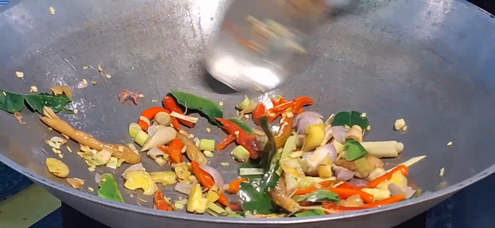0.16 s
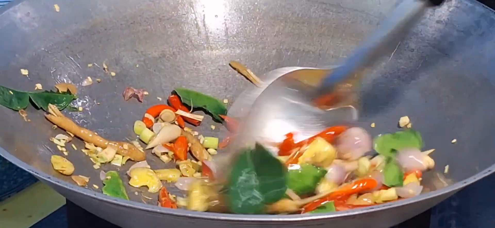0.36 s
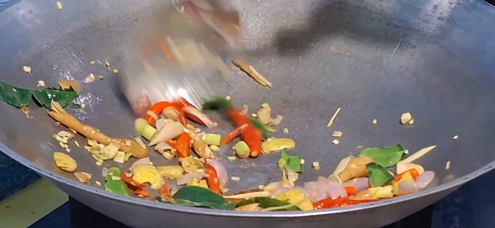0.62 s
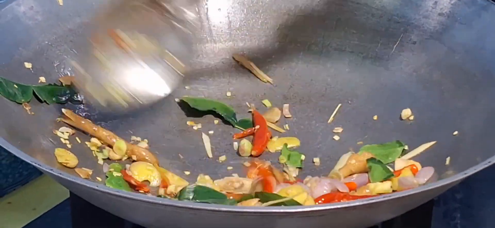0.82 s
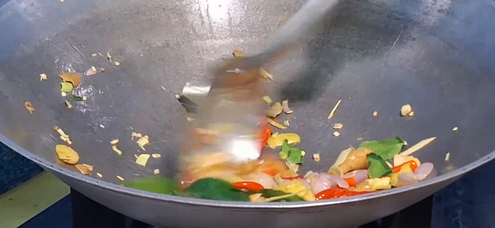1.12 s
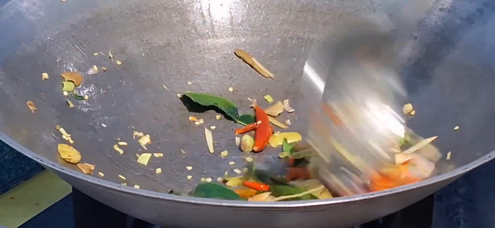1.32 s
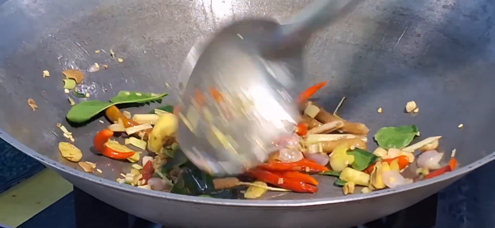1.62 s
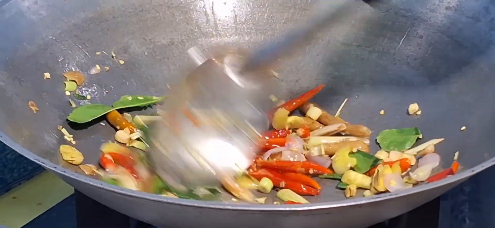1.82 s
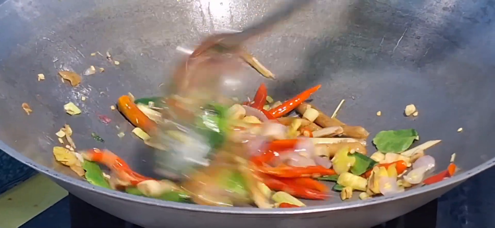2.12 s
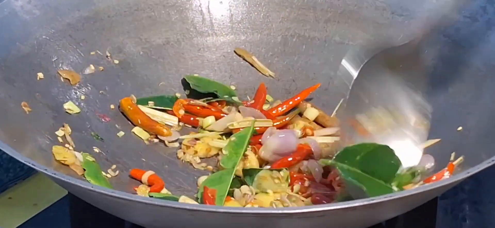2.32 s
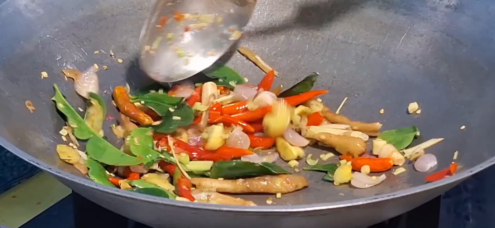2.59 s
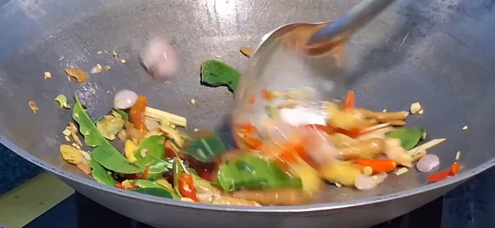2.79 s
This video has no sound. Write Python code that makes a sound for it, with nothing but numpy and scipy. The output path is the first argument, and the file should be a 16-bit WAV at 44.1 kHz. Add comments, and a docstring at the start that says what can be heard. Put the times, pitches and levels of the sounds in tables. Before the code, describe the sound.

A metal spatula clanks and scrapes in a wide wok, close in stereo in a small kitchen. Soft sizzle, low burner rumble and faint hum run throughout. A light food pat at 0.1 s precedes ringing knocks at 0.24, 0.64, 1.0, 1.4, 1.8, 2.4 and 2.7 s. Short raspy slides follow most, longest around 1.0-1.2; faint pats fall near 0.9, 1.6 and 2.1; sizzle swells around 1.5.

```python
"""A soft sizzle over a low hum and a burner's rumble; a small pat of food, then the first knock of steel on steel.
A spatula tosses chillies, herbs and shallots in a wide wok, close by in a small kitchen. Seven knocks excite
decaying modes of wok, blade and stove; slides of the blade are random slips filtered into rasp and ringing.
Pats are bursts of clicks, the sizzle is sputtering noise with pops, and the burner is low noise and two sines."""
import sys
import numpy as np
from scipy import signal
from scipy.fft import irfft
from scipy.io import wavfile
from scipy.ndimage import uniform_filter1d, map_coordinates

SR = 44100
rng = np.random.default_rng(int(sys.argv[2]) if len(sys.argv) > 2 else 0)


def int16_out(signal):
    """Quantize to a 16-bit WAV file."""
    q = np.round(np.clip(np.atleast_2d(signal).T, -1, 1) * 32767)
    wavfile.write(sys.argv[1], SR, q.astype(np.int16))


N = 130095  # samples in the scene

# blade meets pan: (time [s], favoured wok pitch [Hz], favoured blade pitch [Hz], added crack [dB],
# stove thump [dB], wok modes [dB], blade modes [dB], then the clang's gain at each of TONE_HZ [dB])
KNOCKS = [(0.2383, 970, 4160, 2, -34.5, -34, -23, -24.5, -21, -19.5, -11.5),
          (.6414, 950, 4570, 1.5, -39.5, -36, -31, -27.5, -29.5, -18, -14),
          (1.004, 704, 1950, -2, -48, -34.5, -24.5, -59, -27, -30, -18),
          (1.425, 474, 4080, -6.5, -40.5, -29, -39, -21, -29, -19.5, -17.5),
          (1.7808, 670, 4680, 5.5, -41.5, -30, -19.5, -24, -23, -18, -15),
          (2.4005, 489, 6800, 5.5, -34, -26.5, -34, -13.5, -17.5, -15.5, -12.5),
          (2.7084, 900, 3600, -1, -36.5, -36, -27.5, -24, -22, -20, -18)]
# corners of the tone curve given to each knock and slide: (frequency [Hz])
TONE_HZ = [450, 1600, 4200, 9000]
# blade slides on: (start [s], time to hardest push [s], length [s], pitch factor [ratio], ring of the pan [dB],
# then gain at each of TONE_HZ [dB])
SCRAPES = [(.243, 0.0093, 0.09, 0.9, -13, -25.5, -28, -22.5, -20),
           (.645, 0.026, 0.038, 0.98, -12, -29, -28.5, -18, -19),
           (.684, .028, 0.1, .98, -22, -28.5, -31, -27, -26),
           (.742, 0.014, 0.047, .94, -6, -35.5, -21.5, -29.5, -30),
           (1.006, 0.015, 0.062, 0.96, -6, -32, -19.5, -26, -26),
           (1.05, 0.041, 0.15, .97, -11, -22.5, -32, -22, -18.5),
           (1.14, 0.039, 0.087, 0.87, -20, -24, -39, -35.5, -36),
           (1.785, 0.017, 0.057, 0.98, -12, -18.5, -38, -21, -20.5),
           (2.715, 0.019, .12, 0.94, -16, -29, -30.5, -28.5, -26),
           (2.775, 0.023, .035, .94, -13, -43, -28.5, -35, -42)]
# food lands on the pan: (time [s], level [dB])
PATS = [(.104, -36), (0.915, -35), (1.567, -36.5), (2.113, -37.5)]
# pitches of the wok's modes: (frequency [Hz])
WOK_HZ = [322, 382, 421, 468, 535, 590, 666, 698, 777, 845, 885, 1025, 2140]
# ring of the wok at each of WOK_HZ: (relative level [dB], t60 [s])
WOK_RINGS = [(-16.5, 0.91), (-7, 0.57), (-9.5, 0.54), (-10, 0.5), (-8.5, 0.42), (-2, 0.37), (-2, 0.53),
             (-1, 0.38), (-7.5, 0.41), (-4, 0.38), (-5, .34), (0.5, 0.18), (-8, 0.32)]
# rings of the blade: (frequency [Hz], relative level [dB])
BLADE_RINGS = [(3495, -2), (4016, -6), (4190, -4), (4416, -2), (5176, -5), (5340, -4), (6360, -10)]
# rings of the stove under the wok: (frequency [Hz], relative level [dB], t60 [s])
STOVE_RINGS = [(66.9, 2, 0.64), (83.2, -5, 0.89), (132.5, 6, 0.27), (221, 6.5, 0.2), (303.3, 1.5, 0.43)]
# spectrum of the crowd of weaker modes: (frequency [Hz], relative level per Hz [dB])
CLANG_SPECTRUM = [(100, -26), (250, -12), (480, 0.5), (650, 5), (1000, 6), (1270, -3), (1600, 1.5),
                  (2100, 3), (2800, -6), (3600, -0.5), (4400, 0), (5900, -4.5), (7500, -4.5),
                  (11000, -10.5), (16000, -14)]
# decay of that crowd: (frequency [Hz], t60 [s])
CLANG_T60 = [(200, 0.67), (700, 0.31), (3500, .33), (12000, 0.32)]
# spectrum of the rasping slips: (frequency [Hz], relative level per Hz [dB])
RASP_SPECTRUM = [(150, -12), (740, -3), (1270, -20), (1700, -12), (2450, -3), (3400, 0.5), (4300, 4),
                 (6300, -1.5), (16000, -9)]
# resonances of the blade pressed on the pan, before the pitch factor and the sag:
# (frequency [Hz], width [Hz], relative level [dB])
SLIDING_RESONANCES = [(860, 14.4, -11), (1119, 18, -15), (1700, 20, -13), (1913, 47, -17),
                      (2246, 26, -13.5), (2976, 80, -11), (3700, 32, -9), (4294, 200, -3),
                      (5370, 53, -10.5)]
# spectrum of landing food: (frequency [Hz], relative level per Hz [dB])
PAT_SPECTRUM = [(150, -28), (1000, -2), (2400, 10.5), (5000, 9), (15000, -2)]
# sizzle swells when food is turned on to hot metal: (time [s], level [dB])
SIZZLE_LEVEL = [(.14, -32), (.5, -33.5), (.87, -37.5), (1.378, -37.5), (1.548, -32), (2.05, -34.5),
                (2.33, -35), (2.6, -33), (2.95, -34.5)]
# spectrum of the sizzle: (frequency [Hz], relative level per Hz [dB])
SIZZLE_SPECTRUM = [(150, -57), (250, -5.5), (606, -9), (672, -4.5), (786, -8.5), (1300, -11), (1970, -8),
                   (3090, -4), (8030, -1), (15800, -1.5)]
# spectrum of the burner's rumble: (frequency [Hz], relative level per Hz [dB])
RUMBLE_SPECTRUM = [(20, -38), (35, -4.5), (66, 3.5), (82, 4), (105, -4.5), (140, -6), (600, -24),
                   (2000, -56)]
# motor hum: (frequency [Hz], rms level [dB])
HUM = [(48.6, -50.5), (143, -60)]
# stereo width: (frequency [Hz], gain of the side signal [dB])
WIDTH = [(60, -14.5), (130, -9.5), (280, -14), (550, -6.5), (1000, -2), (2000, 0)]
# balance of the microphones: (frequency [Hz], left minus right [dB])
BALANCE = [(60, 3), (140, 0), (4000, 0.5), (12000, -2)]

# knocks
RING_S = 0.6  # length given to each knock and slide
MODE_SCATTER_DB, RING_RISE_S, THUMP_RISE_S = 3.5, 0.0011, 0.0078
BLADE_T60_S = 0.22
MODE_SHARE = 0.11  # share of whole-Hz pitches that belong to the crowd of weaker modes
CRACK_S = 0.009  # fade of the edge's first bite
RIPPLE_DB, RIPPLE_HZ = 3.8, 75  # depth for the clang; spacing of peaks and dips
# each spot that is struck favours the modes near two pitches
SPOT_DB, WOK_SPOT_OCTAVES, BLADE_SPOT_OCTAVES = 5.5, 0.25, 0.12

# scrapes
SLIPS_PER_S, SLIP_SPREAD_DB = 3500, 3
START_FORCE = 0.58  # share of the hardest push
CLUMP_DB, CLUMP_S = 1.5, 0.003  # the edge catches and lets go
RASP_RIPPLE_DB, SLIDING_DB = 6.5, -1
SAG_PER_S = 0.55  # exponential rate at which pitch falls with travel
RUB_HZ, RUB_WIDTH_HZ = 685, 16  # the pan's own resonance

# food, burner and room
PAT_GRAINS_PER_S, PAT_S = 840, 0.026  # click density; fade time constant
POPS_PER_S, POP_SPREAD_DB, POPS_DB = 2000, 3, -6.5  # POPS_DB is relative to the raw hiss
SPUTTER_DB = 1.82  # the hiss comes in short, uneven puffs
RUMBLE_DB = -44
ROOM_T60_S, ROOM_DB = 0.34, -4.5

# microphones
CEILING, EDGE_HZ = 0.95, 15950  # soft limit at full scale 1; band limit


def knocks():
    """Each blow cracks, rings pan and blade with a crowd of weaker modes, and shakes the stove."""
    out = np.zeros((2, N))
    t = np.arange(0, RING_S, 1 / SR)
    hz = np.geomspace(50, 16000, 300)
    for s, wok_hz, blade_hz, crack_db, thump_db, wok_db, blade_db, *tone_db in KNOCKS:
        clang = weaker_modes(t)
        clang = clang * (1 + amp(crack_db) * np.exp(-t / CRACK_S))
        clang = clang * (1 - np.exp(-t / RING_RISE_S))
        clang = colour(clang, list(zip(TONE_HZ, tone_db)))

        wok_modes = [(pitch, *mode) for pitch, mode in zip(WOK_HZ, WOK_RINGS)]
        blade_modes = [(*mode, BLADE_T60_S) for mode in BLADE_RINGS]
        wok = amp(wok_db) * ring(wok_modes, RING_RISE_S)
        blade = amp(blade_db) * ring(blade_modes, RING_RISE_S)

        favour = bump(hz, wok_hz, WOK_SPOT_OCTAVES) + bump(hz, blade_hz, BLADE_SPOT_OCTAVES)
        metal = colour(clang + wok + blade, list(zip(hz, SPOT_DB * favour)))
        thump = amp(thump_db) * ring(STOVE_RINGS, THUMP_RISE_S)
        add(out, s, metal + thump)
    return out


def weaker_modes(t):
    """Many faint modes with random phases, each pitch region decaying at its own speed."""
    is_mode = rng.random(SR // 2 + 1) < MODE_SHARE  # one bin per Hz
    phases = np.exp(2j * np.pi * rng.random((2, len(is_mode))))
    crowd = evened(irfft(is_mode * phases))[:, :len(t)]
    crowd = uneven(colour(crowd, CLANG_SPECTRUM), RIPPLE_DB)
    return die_away(evened(crowd), CLANG_T60)


def ring(modes, rise_s):
    """Decaying modes of varying strength; each reaches one microphone a quarter cycle before the other."""
    t, out = np.arange(0, RING_S, 1 / SR), 0
    for hz, db, t60 in modes:
        size = amp(db + MODE_SCATTER_DB * rng.standard_normal())
        lead = rng.permutation([0, .25])[:, None]  # in cycles, for either microphone
        turns = hz * t + rng.random() + lead
        decay = np.exp(-np.log(1000) * t / t60)
        out = out + size * decay * np.sin(2 * np.pi * turns)
    return out * (1 - np.exp(-t / rise_s))


def scrapes():
    """Tiny slips of the edge rasp, ring the pan, and feed resonances that sag as the blade travels."""
    out = np.zeros((2, N))
    t = np.arange(0, RING_S, 1 / SR)
    for s, push_s, length, pitch, pan_db, *tone_db in SCRAPES:
        force = np.interp(t, [0, push_s, max(length, push_s)], [START_FORCE, 1, 0])
        catch = np.interp(t / CLUMP_S, np.arange(len(t)), rng.standard_normal(len(t)))
        slips = grains(len(t), SLIPS_PER_S, SLIP_SPREAD_DB) * force * amp(CLUMP_DB * catch)

        rasp = evened(sag(uneven(colour(slips, RASP_SPECTRUM), RASP_RIPPLE_DB)))
        sliding = 0
        for hz, width, db in SLIDING_RESONANCES:
            falling_hz = hz * pitch * np.exp(-SAG_PER_S * t)
            sliding = sliding + amp(db) * evened(resonate(slips, falling_hz, width))
        pan = evened(resonate(slips, np.full(len(t), RUB_HZ), RUB_WIDTH_HZ))

        sound = rasp + amp(SLIDING_DB) * sliding + amp(pan_db) * pan
        sound = sound * np.sqrt(np.mean(force ** 2))  # loudness follows the push
        add(out, s, colour(sound, list(zip(TONE_HZ, tone_db))))
    return out


def resonate(x, hz, width):
    """A resonance that follows the curve hz, with its far skirts trimmed."""
    turn = np.exp(2j * np.pi * np.cumsum(hz) / SR)
    x = x / turn  # shifts the resonance down to 0 Hz
    for r in np.exp(-np.pi * width * np.array([1, 8]) / SR):
        x = signal.lfilter([1 - r], [1, -r], x)
    return (turn * x).real


def sag(x):
    """Plays a sound ever slower, so that all its peaks glide down together."""
    at = np.cumsum(np.exp(-SAG_PER_S * np.arange(x.shape[1]) / SR))
    return np.array([map_coordinates(channel, [at], order=5) for channel in x])


def uneven(x, depth_db):
    """Thin steel radiates unevenly: random peaks and dips, new for each point of contact."""
    hz = np.arange(0, SR / 2, RIPPLE_HZ)
    ripple = np.clip(rng.standard_normal(len(hz)), -2, 1.6)
    db = depth_db * ripple * np.minimum(hz / 1500, 1)  # shallower below 1500 Hz
    return colour(x, list(zip(hz, db)))


def pats():
    """Tossed pieces fall back in a short patter of random clicks that fades exponentially."""
    out = np.zeros((2, N))
    t = np.arange(SR // 4) / SR
    for s, db in PATS:
        patter = evened(colour(grains(len(t), PAT_GRAINS_PER_S, POP_SPREAD_DB), PAT_SPECTRUM))
        add(out, s, amp(db) * patter * np.exp(-t / PAT_S))
    return out


def sizzle():
    """Moisture boils off the food: a fine hiss with small pops in it."""
    hiss = rng.standard_normal((2, N))
    pops = amp(POPS_DB) * grains(N, POPS_PER_S, POP_SPREAD_DB)
    level_db = np.interp(np.arange(N) / SR, *np.transpose(SIZZLE_LEVEL))
    return evened(colour(sputter(hiss + pops), SIZZLE_SPECTRUM)) * amp(level_db)


def sputter(x):
    """Random swells, each a few tens of ms long and about a kHz wide."""
    z = signal.stft(x, SR, nperseg=256)[2]
    patches = uniform_filter1d(rng.standard_normal(z.shape[1:]), size=8, axis=0)  # across frequency
    patches = uniform_filter1d(patches, size=10, axis=1)  # across time
    return signal.istft(z * amp(SPUTTER_DB * evened(patches)), SR)[1][:, :x.shape[1]]


def burner():
    """Low rumble of the flame as coloured noise, and a steady motor hum of pure tones."""
    t = np.arange(N) / SR
    hum = 0
    for hz, db in HUM:
        hum = hum + amp(db) * np.sqrt(2) * np.sin(2 * np.pi * (hz * t + rng.random()))
    rumble = evened(colour(rng.standard_normal((2, N)), RUMBLE_SPECTRUM))
    return hum + amp(RUMBLE_DB) * rumble


def kitchen(x):
    """Adds a short tail of sparse reflections that decay exponentially."""
    t = np.arange(SR // 2) / SR
    tail = grains(len(t), 3000, 0.91) * np.exp(-np.log(1000) * t / ROOM_T60_S)
    tail = tail / np.linalg.norm(tail[0])
    return x + amp(ROOM_DB) * signal.fftconvolve(x, tail, axes=1)[:, :N]


def grains(count, per_s, spread_db):
    """Random clicks of uneven size and either sign, drawn separately for each microphone."""
    size = amp(spread_db * np.minimum(rng.exponential(1, (2, count)), 5))
    sign = rng.choice([-1, 1], (2, count))
    happens = rng.random((2, count)) < per_s / SR
    return evened(size * sign * happens)


def die_away(x, t60s):
    """Lets each frequency decay at its own speed."""
    hz, t, z = signal.stft(x, SR, nperseg=256)
    z = z * amp(-60 * t / read(t60s, hz)[:, None])
    return signal.istft(z, SR)[1][:, :x.shape[1]]


def colour(x, points):
    """Causal minimum-phase filter with the given (frequency [Hz], gain [dB]) curve."""
    size = 4096
    log_gain = np.log(amp(read(points, abs(np.fft.fftfreq(size, 1 / SR)))))
    taps = np.fft.ifft(np.exp(np.conj(signal.hilbert(log_gain)))).real[:size // 2]
    return signal.fftconvolve(x, taps[None], axes=1)[:, :x.shape[1]]


def bump(hz, centre_hz, octaves):
    """A bell of height 1 on a log-frequency axis."""
    return np.exp(-(np.log2(hz / centre_hz) / octaves) ** 2)


def read(points, hz):
    """Reads a table on a log-frequency axis."""
    f, value = np.transpose(points)
    return np.interp(np.log(hz + 1), np.log(f + 1), value)


def amp(db):
    """Decibels to gain."""
    return 10 ** (np.asarray(db) / 20)


def evened(x):
    """Scales to an rms of 1."""
    return x / np.sqrt(np.mean(x ** 2) + 1e-20)


def add(mix, s, sound):
    """Mixes a stereo sound in at time s, in seconds."""
    part = mix[:, round(s * SR):][:, :sound.shape[1]]
    part += sound[:, :part.shape[1]]


def scene():
    """All sources at the stove; the slides and pats also get the kitchen's reflections."""
    return knocks() + kitchen(scrapes() + pats()) + sizzle() + burner()


def record(dry):
    """Two close microphones hear the bass almost alike; peaks are rounded off, then the band limit."""
    mid = dry.mean(0, keepdims=True)
    side = colour((dry[:1] - dry[1:]) / 2, WIDTH)
    left = colour(mid + side, [(hz, db / 2) for hz, db in BALANCE])
    right = colour(mid - side, [(hz, -db / 2) for hz, db in BALANCE])
    rounded = CEILING * np.tanh(np.vstack([left, right]) / CEILING)
    low_pass = signal.firwin(511, EDGE_HZ, window=("kaiser", 8), fs=SR)
    return signal.oaconvolve(rounded, low_pass[None], "same")


dry = scene()
out = record(dry)
int16_out(out)
```